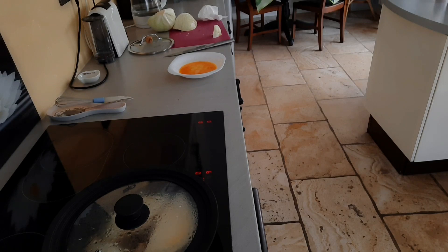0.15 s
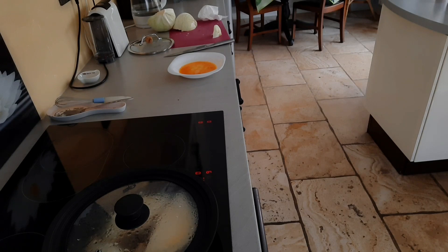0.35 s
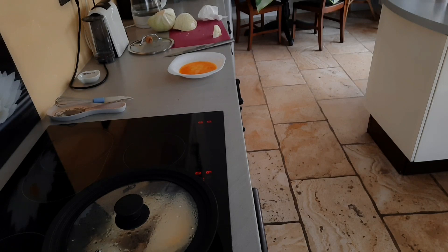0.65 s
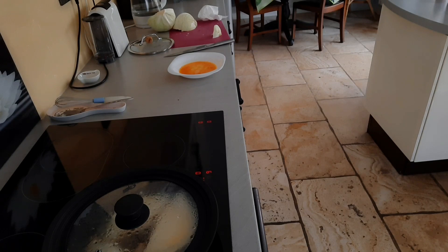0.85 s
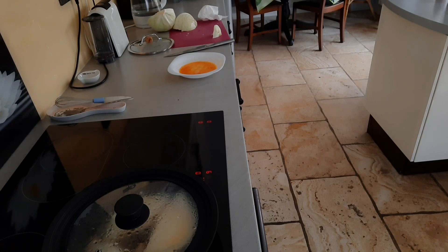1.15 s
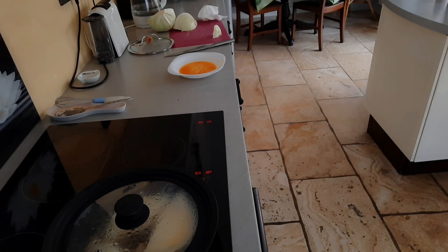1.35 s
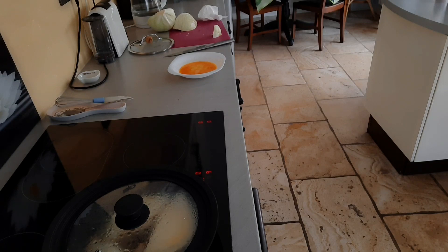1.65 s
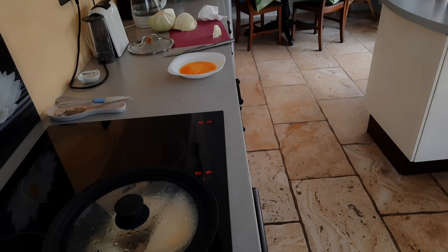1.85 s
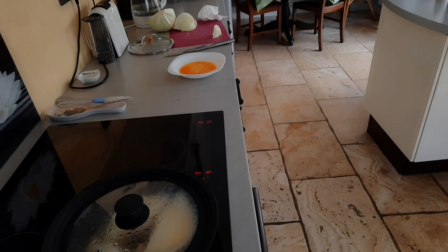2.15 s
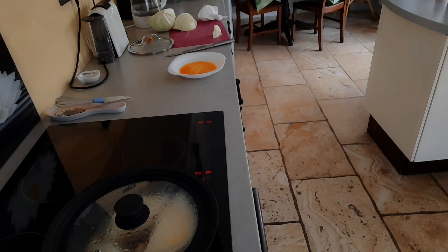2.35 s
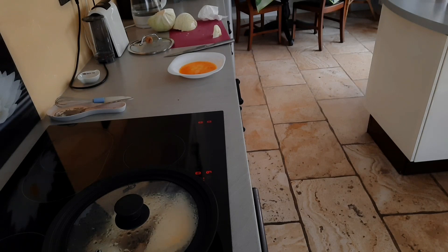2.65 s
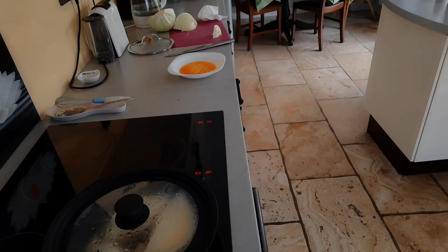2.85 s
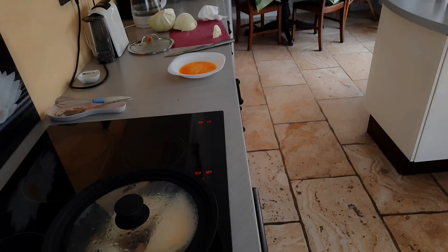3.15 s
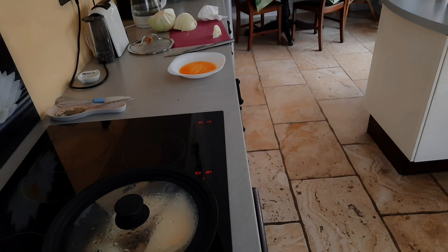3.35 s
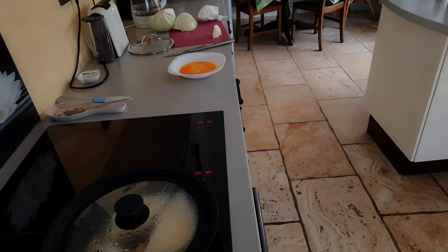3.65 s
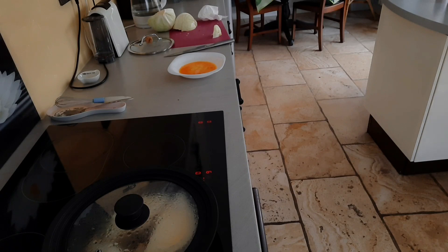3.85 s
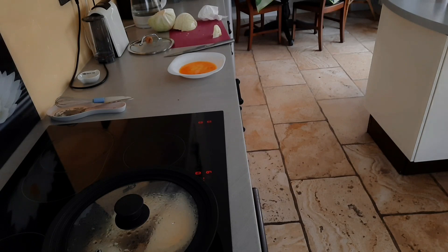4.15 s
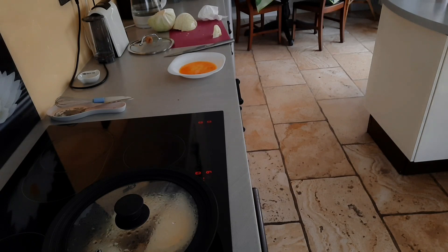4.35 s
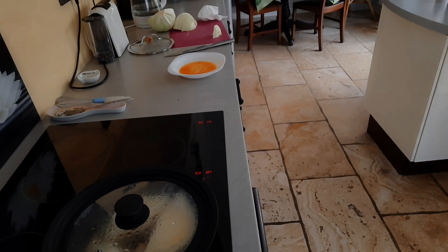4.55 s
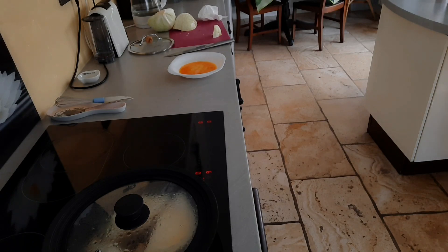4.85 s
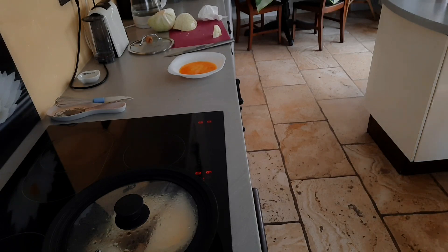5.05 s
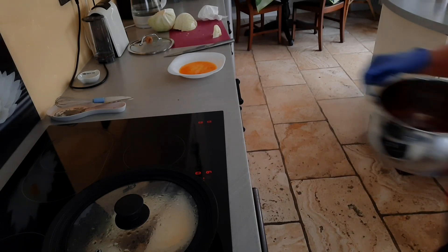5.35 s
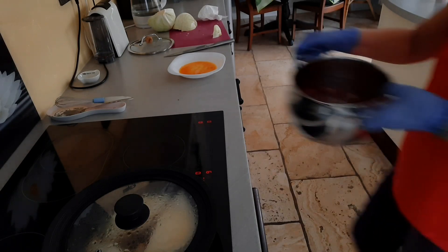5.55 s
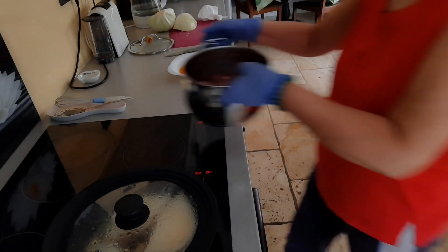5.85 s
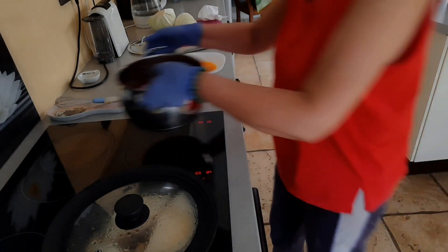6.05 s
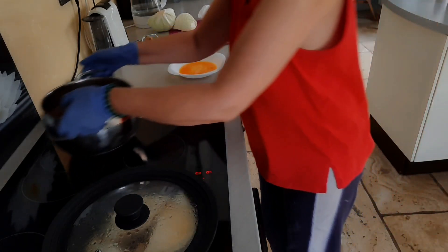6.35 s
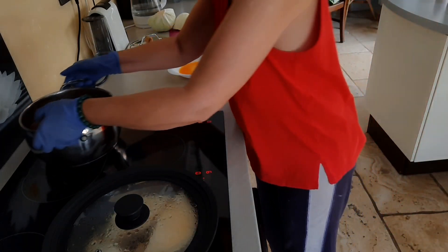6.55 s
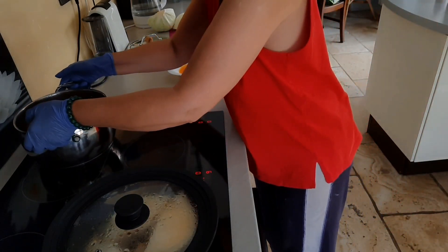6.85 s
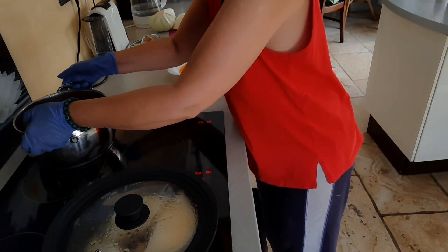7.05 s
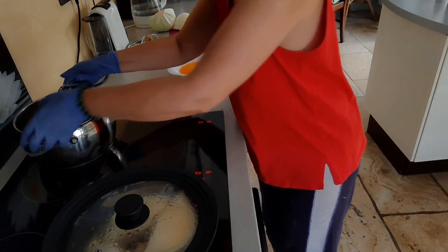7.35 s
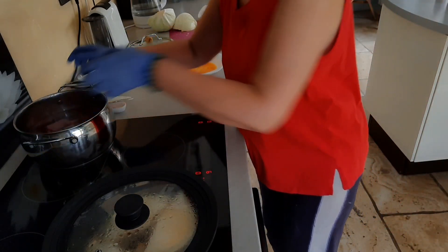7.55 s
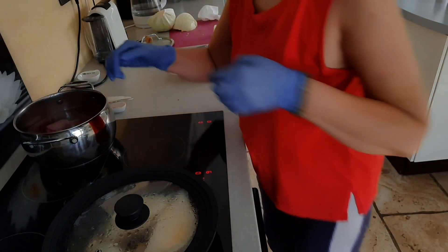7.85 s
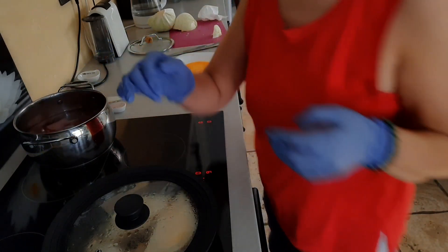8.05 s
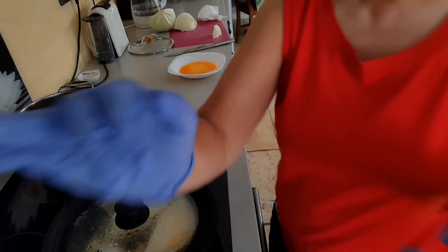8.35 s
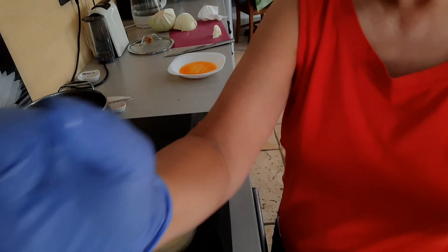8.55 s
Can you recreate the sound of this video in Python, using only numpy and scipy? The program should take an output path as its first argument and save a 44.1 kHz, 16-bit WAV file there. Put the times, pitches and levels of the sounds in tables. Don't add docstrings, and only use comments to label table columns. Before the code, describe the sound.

Steady lidded frying with bright fat spits and hollow pops; a drawer thuds, water runs briefly, then hard knocks and a full pot set down.

```python
import sys
import numpy as np
from scipy import signal
from scipy.fft import rfft, irfft
from scipy.io import wavfile
from scipy.ndimage import uniform_filter1d

SR = 44100
rng = np.random.default_rng(int(sys.argv[2]) if len(sys.argv) > 2 else 0)


def how_loud(loudness_db):
    steps = np.asarray(loudness_db, float) / 20
    return 10 ** steps


def wrap_up_sound(samples):
    columns = np.atleast_2d(samples).T
    tamed = np.clip(columns, -1, 1)
    steps = np.round(tamed * 32767).astype(np.int16)
    wavfile.write(sys.argv[1], SR, steps)


N = 382788

# time in seconds, level of the bubbling under the lid in dB.
FRYING_VIGOUR = [(0, -37), (.19, -36), (1.55, -40), (2.15, -36.5), (2.8, -37.5), (3.46, -40.5), (3.77, -37),
                 (3.99, -40.5), (4.33, -35.5), (4.5, -39), (5.08, -40), (5.25, -37.5), (6.09, -42.5),
                 (6.55, -37), (7.37, -38), (7.83, -44.5), (8.05, -36.5), (8.68, -39.5)]
# start in seconds, peak in dB, pan in dB, pitch in Hz.
BIG_POPS = [(0.119, -12, 3, 1310), (0.208, -17.5, -0.5, 1400), (0.2276, -17, -0.5, 1280),
            (0.3202, -17.5, -1.5, 1420), (1.2395, -17.5, -1.0, 1300), (1.697, -14.5, 1.0, 1276),
            (2.137, -15, 0.0, 1370), (2.718, -17.5, -1.5, 1380), (3.257, -17.5, 2.0, 1335),
            (3.5623, -17, 0.0, 1360), (3.6112, -18, -0.5, 1370), (3.9107, -14.5, -0.5, 1290),
            (4.1659, -16.5, 2, 1390), (4.2268, -14.5, 1.0, 1400), (4.34, -18, 0, 1630),
            (4.355, -8, 3, 1370), (4.7285, -19, 3, 1550), (5.0394, -15.5, 0.0, 1380),
            (5.1988, -5, -1, 1410), (5.298, -15.5, 1.5, 1370), (5.3394, -16, 4, 1280),
            (6.1537, -17, 0.0, 1390), (6.4742, -18, -2, 1380), (7.0446, -20, -1.5, 1390),
            (7.296, -15.5, -1.0, 1380), (7.3587, -16, -1, 1410), (7.5416, -19, -1.0, 1390),
            (7.884, -12, 0, 1375), (7.9822, -9, -1.0, 1384), (8.2177, -13.5, 2.5, 1260)]
# start in seconds, peak in dB, pan in dB, pitch in Hz.
LID_JOLTS = [
    (2.808, -12, 1.0, 1400),
    (5.5244, -6, 0.0, 1364),
]
# start in seconds, peak in dB, pitch in Hz.
MIDDLING_POPS = [(0.0722, -22, 1390), (0.0912, -21, 1320), (0.1625, -21, 1270), (0.2653, -19, 1390),
                 (0.5536, -23, 1350), (0.6065, -21, 1240), (0.6868, -25, 1340), (0.7003, -22, 1390),
                 (0.7976, -24, 1390), (1.0425, -24, 1270), (1.058, -21, 1250), (1.1792, -20, 1240),
                 (1.2092, -23, 1390), (1.503, -26, 1340), (1.8751, -25, 1380), (1.9899, -25, 1270),
                 (2.0956, -24, 1390), (2.1869, -24, 1400), (2.2054, -22, 1380), (2.2767, -22, 1390),
                 (2.2962, -22, 1250), (2.3471, -23, 1360), (2.3605, -20, 1390), (2.6179, -20, 1380),
                 (2.6359, -23, 1290), (2.9736, -22, 1470), (3.018, -20, 1380), (3.1103, -25, 1420),
                 (3.7075, -23, 1420), (4.2647, -22, 1400), (4.4054, -23, 1370), (4.6718, -23, 1390),
                 (5.1287, -23, 1380), (5.685, -23, 1380), (5.7229, -21, 1290), (5.8212, -24, 1270),
                 (6.0606, -26, 1380), (6.3465, -22, 1370), (6.4308, -24, 1410), (6.4487, -21, 1370),
                 (6.7186, -23, 1270), (6.76, -24, 1420), (6.8394, -26, 1390), (6.9361, -24, 1380),
                 (7.206, -23, 1280), (7.223, -22, 1380), (7.5028, -22, 1590), (7.8491, -19, 1250),
                 (8.103, -24, 1370), (8.1219, -21, 1530), (8.1688, -24, 1350), (8.1908, -23, 1340),
                 (8.4442, -24, 1390), (8.4617, -22, 1380), (8.5195, -25, 1380)]
# start in seconds, peak in
# dB, pitch in Hz.
SMALL_BUBBLES = [(0.0448, -21, 2080), (0.618, -21, 2000), (0.855, -24, 3430), (1.0575, -20, 2050),
                 (1.1184, -25, 2360), (1.1215, -23, 3100), (1.6626, -27.5, 2000), (1.7025, -21, 2010),
                 (1.7355, -22, 2050), (2.2473, -18, 2220), (2.8085, -15, 2150), (2.8574, -18, 2400),
                 (2.9412, -26, 2080), (3.0185, -25, 3440), (3.5608, -24, 4100), (4.1964, -25, 2340),
                 (4.3126, -30, 4170), (4.4363, -24, 3600), (4.6448, -24, 2100), (5.1287, -26, 2040),
                 (5.4251, -26, 4200), (5.5243, -17, 3560), (5.6735, -22, 2320), (6.1838, -20.5, 2380),
                 (6.6343, -14, 2230), (7.1117, -22, 2070), (7.1591, -28, 2030), (7.4789, -23, 2040),
                 (8.0062, -21, 2060)]
# start in seconds, peak in dB, pitch in Hz.
TINY_CHIRPS = [(0.0732, -29, 3440), (0.173, -30, 3430), (0.4713, -26, 4140), (0.6185, -26, 3430),
               (0.6908, -29, 3440), (0.7886, -28, 4020), (0.855, -24, 3430), (0.9163, -27, 4170),
               (1.0565, -24, 4140), (1.1184, -25, 3460), (1.1852, -28, 3440), (1.2531, -28, 4200),
               (1.4057, -29, 3450), (1.5459, -29, 3450), (1.7025, -27, 3470), (1.7355, -23, 4130),
               (1.9614, -28, 3530), (2.0991, -28, 4130), (2.2468, -24, 3450), (2.8085, -20, 3490),
               (2.8574, -23, 3700), (3.5613, -25, 4150), (3.6895, -28, 4380), (3.7614, -31, 4220),
               (3.8945, -31, 3460), (4.1804, -28, 3600), (4.3131, -28, 4170), (4.4363, -30, 3620),
               (4.6433, -30, 3540), (4.7436, -31, 3490), (4.8628, -29, 3530), (4.9048, -28, 3460),
               (5.022, -29, 3490), (5.2664, -29, 4180), (5.3398, -29, 3480), (5.4251, -26, 4160),
               (5.5248, -20, 3540), (5.5862, -26, 3620), (5.7967, -29, 3400), (5.887, -29, 4120),
               (6.0048, -29, 3600), (6.2043, -29, 3710), (6.6303, -14, 4310), (6.9955, -29, 4210),
               (7.1596, -28, 4180), (7.4784, -25, 3620), (7.7273, -28, 3560), (8.0042, -28, 3620),
               (8.2028, -27, 3540), (8.5774, -29, 4160)]
# start in seconds, peak in dB.
SLOW_BUBBLES = [(0.043, -25), (0.206, -24), (0.263, -25), (0.401, -26), (0.915, -23), (1.695, -25),
                (1.819, -24), (1.929, -27), (1.988, -24), (2.161, -24), (2.441, -29), (2.545, -23),
                (2.709, -26), (3.017, -21), (3.255, -25), (3.433, -27), (3.587, -25), (3.715, -23),
                (3.81, -29), (3.908, -25), (4.151, -29), (4.435, -29), (5.126, -28), (5.195, -27),
                (5.82, -30), (6.05, -33), (6.472, -30), (6.782, -24), (7.158, -29), (7.851, -32)]
# start in seconds, peak in dB, pan in dB up on the left and down on the right.
FAT_SPITS = [(0.0902, -26, 2.5), (0.2134, -19, 6), (0.4474, -25, 3.5), (0.8614, -22, 4.0),
             (0.9298, -25, 3.0), (1.0565, -24, 3.5), (1.266, -18, 6), (1.6786, -25, 3.5), (1.972, -19, 7),
             (2.0667, -24, 3.0), (2.1141, -30, 2.5), (2.2453, -21, 3.0), (3.5608, -20, 5),
             (4.0966, -26, 3.0), (5.5238, -31, 3.0), (5.7274, -28, 3.5), (5.8122, -24, 2.0),
             (6.127, -30, 2.5), (6.4103, -28, 3.5), (6.6298, -19, 0.5), (6.9237, -31, 2), (7.3397, -25, 7),
             (7.9169, -27, 12)]
# start in seconds, gain over its level.
HISS_BURSTS = [(.856, 1.4), (.874, .6), (1.056, 1.7), (1.119, .8), (5.524, 2.2), (6.63, 2.0)]
# pitch in Hz, width in Hz, level in dB.
LID_AIR = [(1145, 110, -5.5), (1260, 101, -1), (1382, 70, 1.2), (1577, 160, -6.5), (1750, 180, -7),
           (2050, 99, -4.5), (2315, 133, -12.5), (2780, 130, -10), (3483, 137, -7.5), (4170, 185, -7)]
# pitch in Hz, width in Hz, level in dB.
WORKTOP_BOOM = [(186, 24, -14.5), (251.6, 31, -9), (302.5, 15.4, 0.35), (372.6, 23, -4), (432, 26.6, -1.5),
                (493, 46, -7), (560, 66, -10)]
# frequency in Hz, density in dB per Hz.
HISS_COLOUR = [(300, -31), (600, -3), (900, -2), (2000, -1), (2500, -1.5), (3100, -7.5), (3600, -1),
               (5200, -3), (6500, -3.5), (8800, -8.5), (12500, -6), (15600, -8.5), (16200, -27)]

# start in seconds, peak in dB, tail in dB, tail t60 in seconds.
POT_LANDING = (6.63, -5.5, -7.5, 0.42)
# pitch in Hz, level in dB, t60 in seconds.
POT_RING = [(161, -3, .14), (301, -1.5, .4), (375, -5, .25), (440, -4, .3), (484, -6, .25), (522, -12, .3),
            (678, -18, .3), (732, -16, .3), (969, -18, .3), (1060, 0.1, .06), (2000, -18, .1),
            (2186, -18, .2), (2250, -17, .25), (2390, -24, .2)]
# frequency in Hz, density in dB per Hz.
POT_THUD_COLOUR = [(21, -39), (35, -8), (206, -11.5), (309, -2), (373, -15), (461, -11), (895, -22),
                   (1110, -18.5), (1700, -30), (2250, -21), (2720, -27), (3620, -26), (10000, -42.5),
                   (13000, -73), (22000, -120)]
# start in seconds, push in dB, tail in dB, tail t60 and tail rise in seconds.
BLOWS = [(1.052, -41, -27.5, 0.18, 0.0031), (5.338, -17, -21.5, 0.22, .008),
         (5.524, -5, -14.5, 0.43, 0.0015), (5.035, -40, -30, .2, .005), (6.6305, -7, -40, .2, .003),
         (7.045, -38, -30, 0.22, .003), (7.29, -43, -33.5, .25, 0.0039), (7.98, -36, -30, 0.24, .005),
         (8.108, -45, -20.5, 0.23, 0.013), (8.217, -43, -30, 0.15, .004)]
# frequency in Hz, density in dB per Hz.
BLOW_COLOUR = [(35, -57), (60, -23), (113, -17), (178, -21), (395, 1.5), (913, -25.5), (1380, -9),
               (1790, -22), (2030, -21), (2250, -23), (4160, -32), (8000, -38), (10400, -69), (17600, -120)]
# pitch in Hz, level in dB, t60 in seconds.
WORKTOP_RING = [(301, -6, .4), (393, -2, .3), (431, -6, .45), (490, -12, .12), (711, -12, .3),
                (880, -13, .2), (1060, -15, .25), (2100, -18, .2)]
# start in seconds, level in dB, t60 in seconds.
DRAWER_SHOVES = [
    (2.807, -12, .3),
    (2.830, -19, .2),
    (2.852, -16, .2),
    (2.872, -17, .2),
    (2.900, -21, .45),
]
# pitch in Hz, width in Hz, level in dB.
CABINET_BODY = [(113, 25, -6), (188, 25, -2), (291, 20, 0), (330, 40, -3), (431, 35, -3), (748, 60, -13),
                (1000, 150, -20), (1378, 80, -22), (1530, 60, -23), (1750, 80, -24)]
# frequency in Hz, density in dB per Hz.
DRAWER_BOOM_COLOUR = [(18, -47), (30, -13), (130, -7.5), (189, -6), (226, -18.5), (308, 1.5), (401, -10),
                      (974, -25.5), (1060, -29), (1730, -24), (2070, -34), (2360, -33.5), (6000, -43.5),
                      (7800, -70), (13200, -120)]

# frequency in Hz, density in dB per Hz.
WATER_COLOUR = [(900, -16), (1800, -5.5), (3000, -1), (5000, -1.4), (8000, -2.5), (12000, -1.5),
                (15600, -10), (16200, -25)]
# frequency in Hz, density in dB per Hz.
RUMBLE_COLOUR = [(18, -55), (33, -44), (48, -11), (68, -4), (86, -9), (104, -2), (119, 0), (134, -6),
                 (151, -24), (157, -15.5), (260, -19.5), (280, -14), (360, -34), (1050, -35), (1600, -70)]
# pitch in Hz, level in dB.
MAINS_LINES = [
    (99.6, -0.3),
    (301, -4),
]
# start in seconds, pitch in Hz, level in dB, t60 in seconds.
LOW_THUDS = [(3.59, 64, -20, 0.32), (3.62, 175, -27, 0.4), (6.632, 76, -23, 0.57), (6.63, 150, -19, 0.16),
             (2.82, 187, -16, .35), (2.811, 312, -13, .22), (2.868, 305, -12, .2)]
# frequency in Hz, left-right correlation from -1 to 1.
PORT_LIKENESS = [(60, 0.99), (180, 0.92), (350, .9), (600, 0.4), (1400, 0.051), (3100, 0.068),
                 (15000, -0.12)]
# frequency in Hz, left minus right in dB.
PORT_LEANING = [(60, -1), (180, -1.0), (550, 0.5), (1650, 2), (4970, -0.5), (15000, 3)]


def rms_one(x):
    return x / np.sqrt(np.mean(x ** 2) + 1e-20)


def seconds(length=N):
    return np.arange(length) / SR


def at_hz(points, hz):
    points = np.array(points)
    return np.interp(np.log(hz), np.log(points[:, 0]), points[:, 1])


def drift(rate):
    r = np.exp(-80 * np.pi * rate / SR)
    white = rng.standard_normal(N // 40 + 2002)
    slow = signal.lfilter([1], [1, -2 * r, r * r], white)[2000:]
    return np.interp(np.arange(N) / 40, np.arange(len(slow)), rms_one(slow))


def resonate(x, hz, width_hz):
    r = np.exp(-np.pi * width_hz / SR)
    zeros = np.array([1, 0, -1]) * (1 - r * r) / 2
    poles = [1, -2 * r * np.cos(2 * np.pi * hz / SR), r * r]
    return signal.lfilter(zeros, poles, x + 1e-18)


def body(x, modes):
    return sum((-1) ** k * how_loud(db) * resonate(x, hz, width) for k, (hz, width, db) in enumerate(modes))


def butter(x, order, hz, kind):
    return signal.sosfilt(signal.butter(order, hz, kind, fs=SR, output="sos"), x)


def coloured(x, spectrum):
    size = x.shape[1]
    hz = np.maximum(np.arange(size // 2 + 1) * SR / size, 1)
    mid, side = rfft(x) * how_loud(at_hz(spectrum, hz))
    alike = np.clip(at_hz(PORT_LIKENESS, hz), -1, 1)
    lean = how_loud(at_hz(PORT_LEANING, hz) / 2)
    mid, side = np.sqrt(1 + alike) * mid, np.sqrt(1 - alike) * side
    return rms_one(irfft([(mid + side) * lean, (mid - side) / lean], size))


def patchy(low_hz, count, shared_db, own_db, rate):
    out = 0
    together = drift(rate / 4) + drift(rate)
    white = rng.standard_normal((2, 2, N))
    edges = low_hz * 2 ** (np.arange(count + 1) / 1.5)
    for k in range(count):
        band = butter(white[k % 2], 2, edges[k:k + 2], "band")
        out = out + band * how_loud(shared_db * together + own_db * drift(rate))
    return out


def grains(per_s, spread_db):
    clicks = np.zeros(N)
    at = np.flatnonzero(rng.random(N) < per_s / SR)
    size_db = spread_db * np.minimum(rng.exponential(1, len(at)), 3.8)
    clicks[at] = how_loud(size_db) * rng.choice([-1, 1], len(at))
    return rms_one(clicks)


def place(out, s, sound):
    i = round(s * SR)
    out[:, i:i + sound.shape[1]] += sound[:, :N - i]
    return out


def echoed(x):
    out, lag = x.copy(), round(.0075 * SR)
    out[..., lag:] += how_loud(-8) * x[..., :-lag]
    return out


def blip_shape(t, peak_s):
    return (t / peak_s) ** 2 * np.exp(2 - 2 * t / peak_s)


def struck(modes, rise, stretch):
    t, out = seconds(SR // 2), 0
    for hz, db, t60 in modes:
        luck, shift = rng.standard_normal(2)
        phase = .3 * shift * np.array([[1], [-1]])
        out = out + how_loud(db + 1.5 * luck - 60 * t / (t60 * stretch)) * np.sin(2 * np.pi * hz * t + phase)
    return out * (1 - np.exp(-t / rise))


def dying(colour, t60, rise, crack_db):
    t = seconds(SR // 2)
    noise = coloured(rng.standard_normal((2, len(t))), colour)
    low = butter(noise, 2, 600, "low")
    high = how_loud(3.5) * (noise - low) * how_loud(-8 * t / t60)
    crack = how_loud(crack_db) * np.exp(-t / 0.0036)
    return (low + high) * (1 - np.exp(-t / rise)) * (how_loud(-60 * t / t60) + crack)


def bubbling(lid_db, simmer_db):
    clumps = drift(16)
    per_s = 550 * how_loud(2.8 * clumps)
    lid = body(grains(per_s, spread_db=6.5), LID_AIR)
    for hz, width, db in LID_AIR:
        lid = lid + 0.48 * how_loud(db) * resonate(grains(per_s / 3, spread_db=5.5), hz, width)
    shake = rng.standard_normal((2, N)) * how_loud(1.0 * clumps + .9 * drift(21))
    shake = coloured(shake, [(100, 0), (1000, 0.1)])
    simmer = rms_one(body(shake, WORKTOP_BOOM))
    return how_loud(lid_db + 1.07) * rms_one(lid), how_loud(simmer_db + 1.7) * simmer


def lesser_pops(vigour_db, count):
    draw, shape = rng.random((count, 2)), rng.standard_normal((count, 3))
    odds = np.cumsum(how_loud(2 * vigour_db))
    s = np.searchsorted(odds, draw[:, 0] * odds[-1]) / SR
    db = -26 + 2.5 * shape[:, 0]
    pan_db = .5 + 2.1 * shape[:, 1]
    main_mode_hz = np.where(draw[:, 1] < .33, 1273, 1380)
    hz = main_mode_hz * (1 + 0.047 * shape[:, 2])
    known = len(MIDDLING_POPS)
    s[:known], db[:known], hz[:known] = np.transpose(MIDDLING_POPS)
    return list(zip(s, db, pan_db, hz))


def pops(vigour_db):
    out, t = np.zeros((2, N)), seconds(SR // 20)
    crack = body(np.exp(-t / .00008), LID_AIR)
    crack = how_loud(-17) * crack / crack.max()
    small = [(s, db - 2.5, 1.5, hz) for s, db, hz in SMALL_BUBBLES]
    for s, db, pan_db, hz in BIG_POPS + LID_JOLTS + small + lesser_pops(vigour_db, count=85):
        turn = rng.normal(-.15, 0.17) * np.array([[1], [-1]])
        blip = np.sin(2 * np.pi * hz * t + turn) * blip_shape(t, .0014)
        pan = how_loud([[pan_db / 2], [-pan_db / 2]])
        place(out, s, how_loud(db) * pan * echoed(how_loud(.6) * blip + crack))
    return out


def chirps():
    out, t = np.zeros((2, N)), seconds(SR // 50)
    swell = t / .002 * np.exp(1 - t / .002)
    for s, db, hz in TINY_CHIRPS:
        turn = rng.normal(0, .8) * np.array([[1], [-1]])
        place(out, s, how_loud(db - 5.5) * np.sin(2 * np.pi * hz * t + turn) * swell)
    return out


def sizzle(level_db):
    level = how_loud(level_db)
    flares = np.abs(grains(22, spread_db=4.0)) / 110
    flares[[round(s * SR) for s, *_ in FAT_SPITS + SMALL_BUBBLES]] = 0.92
    for s, gain in HISS_BURSTS:
        flares[round(s * SR)] = gain
    fade = np.exp(-1 / (0.0082 * SR))
    flaring = rms_one(1 + signal.lfilter([1], [1, -fade], flares))
    noise = patchy(398, count=8, shared_db=.5, own_db=1.0, rate=11)
    hiss = how_loud(1.44) * level * flaring * coloured(noise, HISS_COLOUR)
    carpet = level * how_loud(-8.5) * grains(500 * how_loud(4 * drift(7)), spread_db=2.5) * how_loud([[2.5], [-2.5]])
    clear = np.zeros((2, N))
    for s, db, pan_db in FAT_SPITS:
        clear[:, round((s + .001) * SR)] = how_loud(db + 8.5) * how_loud([pan_db, -pan_db])
    spits = resonate(resonate(carpet + clear, 10900, 5000), 13550, 4800) * 2.16
    return hiss, spits


def bloops():
    pushes = np.zeros((2, N))
    for s, db in SLOW_BUBBLES:
        i = round(s * SR)
        pushes[:, i:i + 441] = how_loud(db + 9.0) * rng.standard_normal(441) * np.exp(-np.arange(441) / 130)
    return how_loud(12.0) * body(pushes, WORKTOP_BOOM)


def pot():
    s, db, tail_db, t60 = POT_LANDING
    modes = how_loud(-7) * echoed(struck(POT_RING, .0006, stretch=.95))
    thud = how_loud(tail_db - 1.5) * dying(POT_THUD_COLOUR, t60, 0.0011, crack_db=3.0)
    return place(np.zeros((2, N)), s, how_loud(db) * (modes + thud))


def knocks():
    out, t = np.zeros((2, N)), seconds(SR // 2)
    push = np.sin(2 * np.pi * 480 * t) * blip_shape(t, .0017)
    click = rms_one(resonate(rng.standard_normal(len(t)), 4000, 5000))
    click = click * np.exp(-((t - .002) / 0.0011) ** 2)
    contact = echoed(push + how_loud(-16) * click)
    for s, push_db, tail_db, t60, rise in BLOWS:
        noise = dying(BLOW_COLOUR, t60, rise, crack_db=-7)
        ring = struck(WORKTOP_RING, rise, stretch=2.7 * t60)
        place(out, s, how_loud(push_db) * contact + how_loud(tail_db) * (.6 * noise + .9 * ring))
    return out


def drawer():
    t = seconds(SR // 2)
    start = round(DRAWER_SHOVES[0][0] * SR) / SR
    judder = rng.standard_normal((2, len(t))) * how_loud(1.8 * drift(40)[:len(t)])
    cabinet = rms_one(body(coloured(judder, [(100, 0), (16000, .1)]), CABINET_BODY))
    boom = coloured(judder, DRAWER_BOOM_COLOUR) + .8 * cabinet
    boom = boom / np.sqrt(uniform_filter1d(np.mean(boom ** 2, 0), size=500))
    rattle = butter(boom, 2, 450, "high")
    shut = 0
    for s, db, t60 in DRAWER_SHOVES:
        since = np.maximum(t + start - s, 0)
        shut = shut + np.clip(since / .004, 0, 1) * how_loud(db - 60 * since / t60)
    return place(np.zeros((2, N)), start, how_loud(1.3) * shut * (boom + 0.3 * rattle))


def tap():
    t, on_s, off_s = seconds(), 2.245, 3.57
    splash = rng.standard_normal((2, N)) * how_loud(0.79 * drift(18))
    closing = np.clip((t - off_s) / 0.13 + 1, 0, 1)
    flow_db = -30 - 1.8 * (t - on_s) - 6 * closing
    return how_loud(flow_db) * (t > on_s) * (t < off_s) * coloured(splash, WATER_COLOUR)


def running():
    t = seconds()
    peak_s, off_s, hob_on_s = 1.46, 3.9, 5.57
    working = -36.5 - 2 * ((t - peak_s) / peak_s) ** 2
    coasting = np.maximum(-46.5 - 10.5 * (t - off_s), -58.5)
    off = np.clip((t - off_s) / .2 + .5, 0, 1)
    motor = np.maximum(-40 - 6.5 * np.maximum(t - 2.7, 0), -56)
    hob = -47 + 1.15 * (t - hob_on_s)
    on = np.clip((t - hob_on_s) / .2 + .5, 0, 1)
    return (1 - off) * working + off * coasting, (1 - on) * motor + on * hob


def appliances():
    t, since = seconds(), seconds(SR // 2)
    rumble_db, hum_db = running()
    out = how_loud(rumble_db + 6.5) * coloured(rng.standard_normal((2, N)), RUMBLE_COLOUR)
    for hz, db in MAINS_LINES:
        out += how_loud(hum_db + db) * np.sqrt(2) * np.sin(2 * np.pi * hz * t)
    for s, hz, db, t60 in LOW_THUDS:
        thud = how_loud(db - 60 * since / t60) * (1 - np.exp(-since / 0.0054)) * np.sin(2 * np.pi * hz * since)
        place(out, s, np.array([thud, thud]))
    return out


def ports(x):
    return np.array([np.roll(x[0], 4), x[1]])


def room(x):
    t, t60_s = seconds(SR // 2), 0.19
    tail = coloured(rng.standard_normal((2, len(t))), [(100, 0), (4100, -3), (16000, -14)])
    tail = tail * how_loud(-60 * t / t60_s) * (t > .004)
    return signal.fftconvolve(tail / np.sqrt(np.sum(tail[0] ** 2)), x[None])[:, :N]


def scene():
    t = seconds()
    fry_db = np.interp(t, *np.transpose(FRYING_VIGOUR))
    vigour_db = fry_db - fry_db.mean()
    calming = np.clip(t - 4.6 + .5, 0, 1)
    lid, simmer = bubbling(fry_db, -39 + 0.66 * vigour_db - 3.5 * calming)
    hiss, spits = sizzle(-36.5 + .33 * vigour_db - .12 * t)
    popping = pops(vigour_db) + chirps()
    near = ports(how_loud([[-3.0], [-3.0]]) * lid + popping + spits)
    walls = room(how_loud(-2.5) * lid + how_loud(-8) * popping.mean(0) + how_loud(-2) * spits.mean(0))
    pan = near + walls + simmer + hiss + bloops()
    return pan + pot() + knocks() + drawer() + tap() + appliances()


def band_limit(x):
    return signal.sosfilt(signal.butter(12, 16240, fs=SR, output="sos"), x)


def record(dry):
    heard = np.clip(butter(dry, 2, 44, "high"), -1, 1)
    top_cut = signal.cheby2(14, 70, 16300, fs=SR, output="sos")
    return band_limit(signal.sosfilt(top_cut, heard))


dry = scene()
out = record(dry)
wrap_up_sound(out)
```